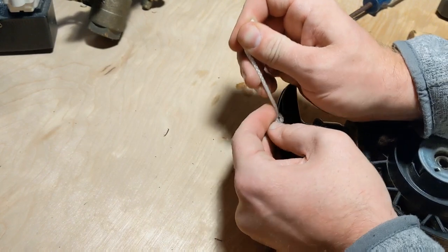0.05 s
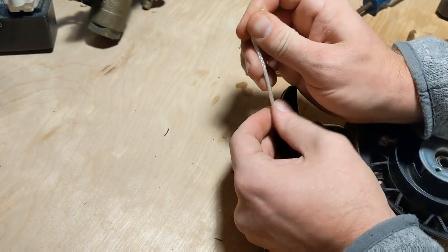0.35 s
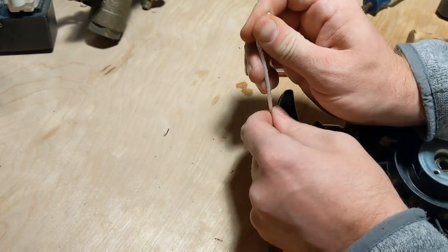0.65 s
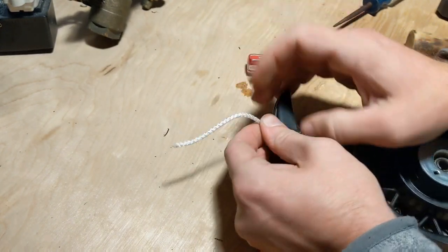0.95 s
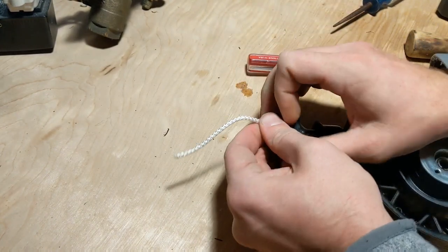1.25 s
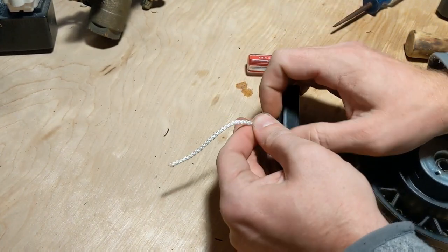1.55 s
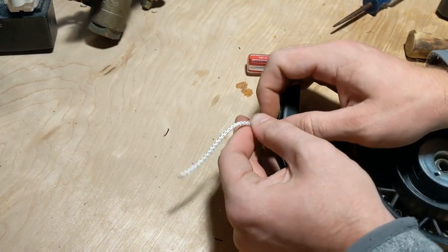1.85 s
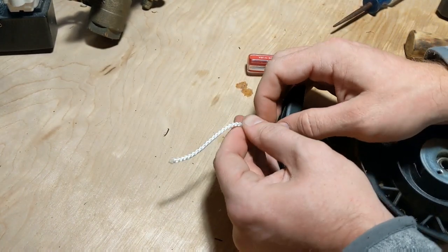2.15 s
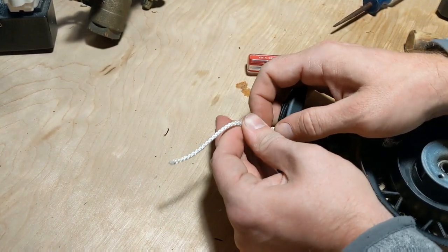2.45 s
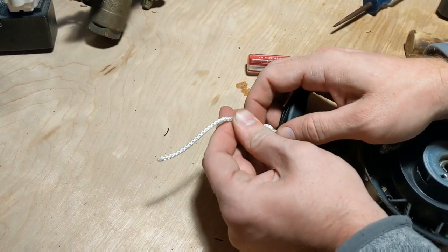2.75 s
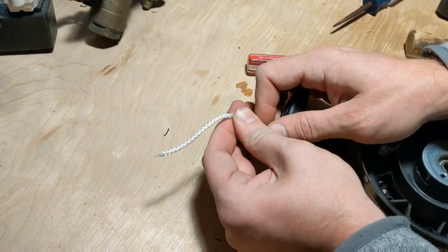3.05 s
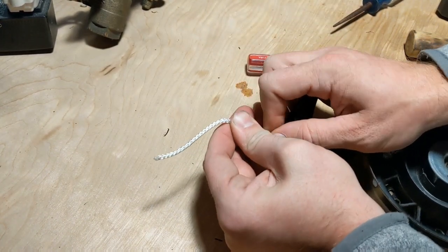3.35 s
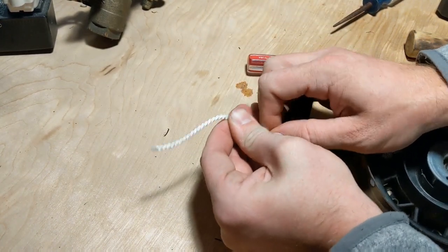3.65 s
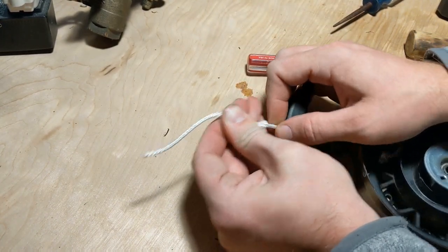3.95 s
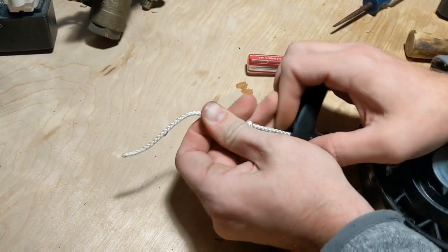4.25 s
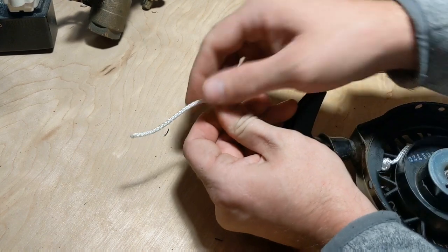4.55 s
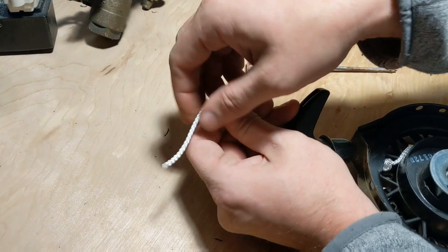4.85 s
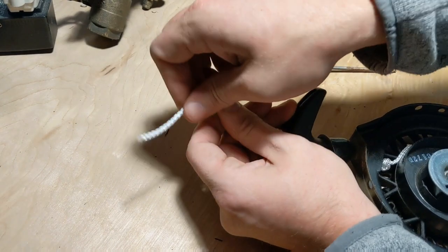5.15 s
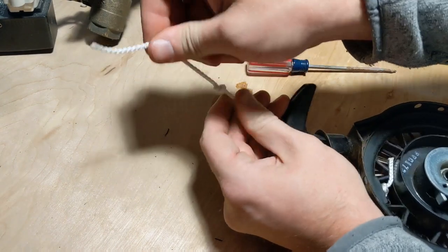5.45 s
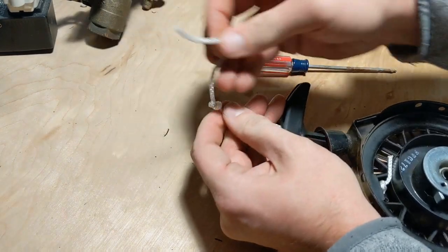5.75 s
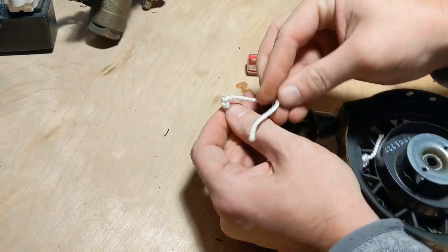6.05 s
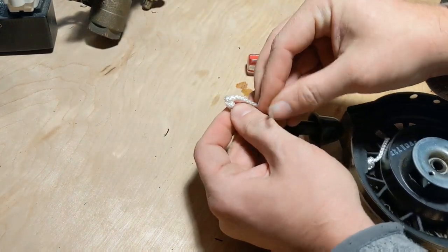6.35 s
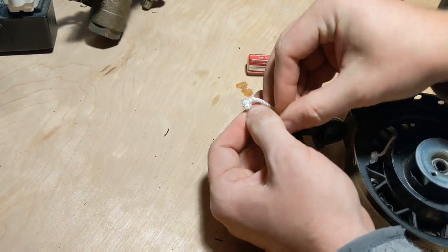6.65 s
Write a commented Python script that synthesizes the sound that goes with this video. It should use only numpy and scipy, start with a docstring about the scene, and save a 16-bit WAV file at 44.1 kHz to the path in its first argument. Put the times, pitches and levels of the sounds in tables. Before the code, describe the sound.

Quiet rubbing and swishing of cord being tied by hand, with scattered light plastic taps and one sharper clack on wood.

```python
"""A small, faintly humming workshop: two hands knot a braided cord above a plywood bench.
Fingers and sleeves rub by stick-slip; the braid hisses and swishes through the fingers.
The cord leads into a plastic pulley housing and rasps over its rim. The housing rocks, knocks and
finally drops on the bench: the shell rings in its modes, the wood thuds and sways."""
import sys
import numpy as np
from scipy import signal
from scipy.fft import rfft, irfft, next_fast_len
from scipy.io import wavfile
from scipy.ndimage import uniform_filter1d, map_coordinates

SR = 44100
rng = np.random.default_rng(int(sys.argv[2]) if len(sys.argv) > 2 else 0)


def to_wav(s):
    """Save 16-bit WAV."""
    ch = np.atleast_2d(s).T  # columns
    pcm = np.round(np.clip(ch, -1, 1) * 32767)  # PCM
    wavfile.write(sys.argv[1], SR, pcm.astype(np.int16))


N = 295911

# left-right likeness: freq_hz, correlation
STEREO_CORRELATION = [(70, 0.99), (160, 0.92), (350, 0.26), (700, 0.0095), (1500, 0.29), (5000, 0.049)]
# stereo balance: freq_hz, left_over_right_db
STEREO_BALANCE = [(200, 0.26), (380, -2), (650, 4), (1300, 2), (2400, 0.5), (4500, 2.5), (15000, 3)]
# room decay: freq_hz, t60_s
ROOM_DECAY = [(80, 0.38), (300, 0.14), (8000, 0.06)]
# room air: freq_hz, density_db
AIR_SPECTRUM = [(20, -30.5), (50, -2.5), (105, -6.5), (200, -16), (350, -20.5), (540, -15.5), (1200, -28.5),
                (2000, -32), (3400, -26.5), (4700, -29), (5800, -27), (7000, -30.5), (15500, -33)]

# skin and cloth rubbing: freq_hz, density_db
RUB_SPECTRUM = [(60, -27.5), (105, -5), (160, 3.5), (225, 2.5), (310, -4.5), (460, -1.5), (690, -9),
                (830, -17.5), (1050, -16), (1600, -39), (3200, -31), (4800, -35.5)]
# fibre hiss: freq_hz, density_db
FIBRE_SPECTRUM = [(800, -4.5), (1400, -6), (2100, -7.5), (3500, -5.5), (4700, -11.5), (5800, -6.5),
                  (7000, -14), (15500, -16)]
# dry fibres crackling: freq_hz, density_db
CRACKLE_SPECTRUM = [(2000, -6.5), (6000, -3), (15000, -8.5)]
# sliding braid: freq_hz, density_db
BRAID_SPECTRUM = [(2000, -14), (3200, -5), (4800, -8.5), (5800, 6.5), (6900, -6.5), (15000, -10)]
# hand strokes along cord and housing: centre_s, length_s, level_db
HAND_STROKES = [(0.121, 0.24, -60.5), (0.378, 0.044, -53.5), (0.62, 0.039, -58), (0.952, 0.058, -57),
                (1.18, 0.12, -57.5), (2.364, 0.11, -61.5), (2.718, 0.088, -63.5), (3.385, 0.098, -62.5),
                (3.886, 0.11, -55.5), (4.13, 0.063, -56), (4.245, 0.11, -55.5), (4.425, 0.1, -46.5),
                (5.56, 0.2, -55), (6.11, 0.095, -52.5), (6.19, 0.14, -43), (6.415, 0.069, -49.5),
                (6.578, 0.13, -53)]
# cord drawn between the fingers: centre_s, length_s, level_db
CORD_DRAWS = [(0.12, 0.27, -72.5), (1.15, 0.4, -69.5), (1.5, 0.17, -73), (2.725, 0.098, -62.5),
              (4.16, 0.12, -63.5), (4.425, 0.07, -66), (4.54, 0.1, -56)]
# fingertip skips: centre_s, level_db
FINGER_SKIPS = [(0.144, -66.5), (0.538, -66.5), (0.728, -67), (0.948, -65.5), (1.134, -65), (1.352, -67.5)]
# nail or strand catches: start_s, level_db
NAIL_CATCHES = [(0.785, -55), (2.337, -63.5), (3.678, -61.5), (4.222, -56), (5.483, -59)]
# braid slips through a pinch: centre_s, length_s, level_db
BRAID_SLIPS = [(1.52, 0.15, -63.5), (2.725, 0.08, -72), (2.81, 0.036, -72), (2.895, 0.025, -69.5),
               (3.06, 0.048, -64.5), (6.025, 0.019, -65)]
# taut braid passes over the rim: centre_s, length_s, level_db
RIM_RASPS = [(3.885, 0.07, -72.5), (4.53, 0.12, -67.5), (6.17, 0.16, -61.5)]
# rim resonances: freq_hz, width_hz, level_db
RIM_MODES = [(2320, 96, -3.5), (3170, 110, 3), (4110, 140, -3), (5600, 340, -10.5)]

# plywood response: freq_hz, density_db
BENCH_SPECTRUM = [(50, 4), (110, 1.5), (155, 3), (180, -3), (218, -1.5), (275, -17.5), (325, 1), (420, -9),
                  (900, -57)]
# hands press on the bench: start_s, level_db, pitch_hz
HAND_BUMPS = [(0.727, -58, 171), (1.135, -49, 190), (1.19, -50.5, 159), (1.227, -52.5, 156),
              (1.514, -48.5, 197), (2.037, -55.5, 187), (4.894, -53, 130), (4.94, -55.5, 120),
              (5.731, -58.5, 183), (5.76, -57.5, 163), (5.797, -58.5, 175)]
# plastic shell modes: freq_hz, level_db, t60_s, left_over_right_db
HOUSING_MODES = [(469, -1, 0.14, -0.5), (523, -5, 0.05, 5), (594.7, 0, 0.1, 9.5), (743, 4.5, 0.05, 13),
                 (1016, -4.5, 0.07, 10), (1148, -4.5, 0.05, 9), (1217, -0.5, 0.031, -4),
                 (1476, -8, 0.047, 14), (1620, -1, 0.059, 3), (1715, -8, 0.058, 13), (1900, -4, 0.042, 9),
                 (2110, 2.5, 0.04, 3.5), (2465, 3, 0.042, 7)]
# phase offset from the shell's uneven radiation: freq_hz, right_lead_rad
HOUSING_PHASE = [(350, 2.7), (620, 2), (1050, 0.22), (2400, 1.95)]
# housing meets bench: start_s, ring_db, hardness_hz, thud_db, thud_hz
HOUSING_KNOCKS = [(0.141, -55, 477, -49.5, 157.5), (0.538, -56, 510, -48.5, 179),
                  (0.786, -44.5, 583, -37, 178), (0.83, -55, 580, -55, 160),
                  (1.352, -62.5, 466, -51.5, 178), (1.489, -61.5, 720, -53.5, 156),
                  (2.147, -52, 437, -41.5, 195), (2.225, -58, 650, -52, 200),
                  (2.391, -44.5, 1340, -58, 202), (2.411, -64, 895, -53, 204),
                  (2.491, -60.5, 420, -50.5, 180), (2.57, -44.5, 480, -42, 218),
                  (2.629, -64.5, 1090, -65, 198), (2.773, -51, 666, -47, 184),
                  (2.806, -39.5, 585, -44, 194), (2.829, -53, 510, -50, 167), (2.996, -35, 600, -44.5, 220),
                  (3.019, -46, 510, -44, 139), (3.379, -60, 770, -60, 177), (3.962, -50, 700, -44, 196),
                  (4.112, -58, 676, -57, 190), (4.152, -45, 630, -45, 181), (4.313, -38, 870, -44, 180),
                  (4.338, -38.5, 570, -41, 186), (4.36, -51, 494, -45.5, 174),
                  (4.397, -55, 730, -55.5, 170.3), (4.415, -42.5, 835, -47, 198),
                  (4.484, -25, 1376, -38.5, 176), (4.536, -46.5, 690, -45.5, 149.6),
                  (5.699, -55.5, 463, -47, 167)]

GRIP_T60_S, GRIP_HARDNESS_HZ = 0.17, 672  # hand damping at this hardness; harder hits ring longer


def amp(db):
    """Decibels to gain."""
    return 10 ** (np.asarray(db) / 20)


def unit_rms(x):
    """x at rms 1."""
    return x / np.sqrt(np.mean(x ** 2) + 1e-20)


def unit_attack(x):
    """x at rms 1 over its first 16 ms."""
    return x / np.sqrt(np.mean(x[..., :SR // 62] ** 2) + 1e-20)


def curve_at(points, hz):
    """(freq_hz, value) points interpolated on a log axis."""
    knots_hz, values = np.transpose(points)
    return np.interp(np.log(hz + 1), np.log(knots_hz + 1), values)


def noise(size):
    """Two independent white channels."""
    return rng.standard_normal((2, size))


def wobble(rate_hz):
    """Smooth random curve."""
    return map_coordinates(rng.standard_normal(int(N * rate_hz / SR) + 4), [np.arange(N) * rate_hz / SR])


def swells(rows):
    """Gaussian envelopes from (centre_s, length_s, level_db), summed in power."""
    t = np.arange(N) / SR
    power = sum(amp(db) ** 2 * np.exp(-(np.pi * (t - centre_s) / length_s) ** 2)
                for centre_s, length_s, db in rows)
    return np.sqrt(power + 1e-20)


def filtered(x, response):
    """x through response(hz)."""
    size = x.shape[-1]
    padded = next_fast_len(size + SR // 4)
    return irfft(rfft(x, padded) * response(np.fft.rfftfreq(padded, 1 / SR)), padded)[..., :size]


def add(track, start_s, sound):
    """Mix a sound into a track."""
    part = track[:, max(round(start_s * SR), 0):][:, :sound.shape[-1]]
    part += sound[..., :part.shape[-1]]


def spread(pair):
    """Independent channels to stereo: alike in the bass, apart in the treble."""
    def mid_side_gains(hz):
        angle_rad = np.arccos(np.clip(curve_at(STEREO_CORRELATION, hz), -1, 1)) / 2
        return np.array([np.cos(angle_rad), np.sin(angle_rad)])
    mid, side = filtered(pair, mid_side_gains)
    balance = lambda hz: amp(np.outer([.5, -.5], curve_at(STEREO_BALANCE, hz)))
    return filtered(np.array([mid + side, mid - side]), balance)


def coloured(pair, spectrum):
    """Stereo texture shaped by a spectrum, rms 1."""
    return unit_rms(spread(filtered(pair, lambda hz: amp(curve_at(spectrum, hz)))))


def room_tone(air_db=-66, hum_hz=40, hum_db=-65):
    """Still air and a deep, wavering hum."""
    drift_rad, waver_db = .3 * wobble(3), 1.5 * wobble(5)
    hum = np.sqrt(2) * np.sin(2 * np.pi * hum_hz * np.arange(N) / SR + drift_rad)
    return amp(air_db) * coloured(noise(N), AIR_SPECTRUM) + amp(hum_db + waver_db) * hum


def room_echo(x, wet_db, rise_s=0.0036):
    """x plus its short echo from clutter and walls."""
    hz, t, bins = signal.stft(noise(SR // 2), SR, nperseg=256)
    envelope = amp(-60 * t / curve_at(ROOM_DECAY, hz)[:, None]) * (1 - np.exp(-t / rise_s)) ** 2
    tail = spread(signal.istft(bins * envelope, SR, nperseg=256)[1])
    echo = signal.fftconvolve(x, tail / np.linalg.norm(tail[0]), axes=1)[:, :x.shape[-1]]
    return x + amp(wet_db) * echo


def friction(rate_hz, scatter_db, slide_gain):
    """Uneven stick-slip releases over smooth sliding noise."""
    releases = (rng.random(N) < rate_hz / SR) * amp(scatter_db * rng.standard_normal(N))
    return unit_rms(releases * noise(N)) + slide_gain * noise(N)


def patchy_hiss(pair, depth_db=3):
    """Random time-frequency patches make the hiss shimmer unevenly."""
    bins = signal.stft(pair, nperseg=512)[2]
    patches = uniform_filter1d(rng.standard_normal(bins.shape[1:]), size=3, axis=0)
    patches = uniform_filter1d(patches, size=16, axis=1)
    return signal.istft(bins * amp(depth_db * unit_rms(patches)), nperseg=512)[1][:, :N]


def hand_rub(idle_rub_db=-71, idle_hiss_db=-84, steady_db=-44,
             hiss_db=-70.5, stroke_ref_db=-53.5, hiss_db_per_db=0.65):
    """Skin and cloth rub dully; the cord's fibres hiss under strokes and draws."""
    stroke = swells(HAND_STROKES)
    # finger pressure flutters in slow strokes, evens out above steady_db
    pressure_db = 1.8 * wobble(40) / (1 + (stroke / amp(steady_db)) ** 2)
    fidget = amp(5.5 * np.tanh(wobble(13)))
    rub_level = np.hypot(stroke, amp(idle_rub_db) * fidget)
    stroke_hiss = amp(hiss_db) * (stroke / amp(stroke_ref_db)) ** hiss_db_per_db
    drag = np.hypot(stroke_hiss, swells(CORD_DRAWS))
    hiss_level = np.hypot(drag, amp(idle_hiss_db) * fidget)
    skin = friction(rate_hz=2000, scatter_db=2, slide_gain=1)
    fibres = friction(rate_hz=900, scatter_db=3.5, slide_gain=1.1)
    rub = rub_level * coloured(skin, RUB_SPECTRUM)
    hiss = hiss_level * coloured(patchy_hiss(fibres), FIBRE_SPECTRUM)
    return amp(pressure_db) * (rub + hiss)


def fibre_crackles(length_s=0.024):
    """A skipping fingertip rustles small clumps of dry fibres."""
    snaps = friction(rate_hz=3000, scatter_db=2, slide_gain=1.2)
    envelope = swells([(centre_s, length_s, db) for centre_s, db in FINGER_SKIPS])
    return envelope * coloured(snaps, CRACKLE_SPECTRUM)


def scratch(size, cutoff_hz=7500):
    """Dry scraping noise with a dulled top."""
    return filtered(coloured(noise(size), FIBRE_SPECTRUM), lambda hz: 1 / (1 + (hz / cutoff_hz) ** 4))


def nail_catches(t60_s=0.09):
    """A nail or strand catches and lets go with a sudden scratch."""
    track, t = np.zeros((2, N)), np.arange(SR // 4) / SR
    for start_s, db in NAIL_CATCHES:
        add(track, start_s, amp(db - 60 * t / t60_s) * scratch(len(t)))
    return track


def braid_slips():
    """The braid slides under a fingertip in short, bright swishes."""
    slide = friction(rate_hz=2000, scatter_db=2, slide_gain=1.2)
    return swells(BRAID_SLIPS) * coloured(slide, BRAID_SPECTRUM)


def rim_rasps(drift_samples=50):
    """The braid's ribs excite rim resonances, which drift with cord tension."""
    def response(hz):
        return sum((-1) ** k * amp(db) * 1j * hz * width_hz / (mode_hz ** 2 - hz ** 2 + 1j * hz * width_hz)
                   for k, (mode_hz, width_hz, db) in enumerate(RIM_MODES))
    ringing = filtered(noise(N), response)
    position = np.arange(N) + drift_samples * wobble(7)
    drifting = np.array([map_coordinates(channel, [position]) for channel in ringing])
    return swells(RIM_RASPS) * unit_rms(spread(drifting))


def bench_sway(t, mode_hz=63, t60_s=0.6, rise_s=0.0018):
    """The whole bench swings in its lowest mode."""
    return np.sin(2 * np.pi * mode_hz * t) * amp(-60 * t / t60_s) * (1 - np.exp(-t / rise_s))


def bench_thud(t, pitch_hz, glide, glide_s=0.0026, push_t60_s=0.041, rise_s=0.0097,
               shudder_gain=0.65, shudder_t60_s=0.14, cutoff_hz=600):
    """A low push, falling in pitch as fast bending waves arrive first, then a diffuse shudder."""
    cycles = pitch_hz * (t + glide * glide_s * (1 - np.exp(-t / glide_s)))
    push = unit_attack(np.sin(2 * np.pi * cycles) * amp(-60 * t / push_t60_s) * (1 - np.exp(-t / rise_s)))
    shudder = unit_attack(coloured(noise(len(t)), BENCH_SPECTRUM) * amp(-60 * t / shudder_t60_s))
    board_inertia = signal.butter(2, cutoff_hz, fs=SR, output="sos")
    return signal.sosfilt(board_inertia, push + shudder_gain * shudder)


def hand_bumps():
    """Soft thuds of the hands through the plywood."""
    track, t = np.zeros((2, N)), np.arange(SR // 2) / SR
    for start_s, db, pitch_hz in HAND_BUMPS:
        add(track, start_s, amp(db) * bench_thud(t, pitch_hz, glide=0.89))
    return track


def housing_ring(t, hardness_hz, rib_t60_s=0.15, jolt_gain=0.039, jolt_t60_s=0.017):
    """One blow on the shell: soft contacts reach the low modes, hard ones mostly the higher."""
    hz, db, t60_s, pan_db = np.transpose(HOUSING_MODES)[:, :, None]
    # each grip shifts the modes; a hard, free drop rings nearly true
    grip = min(1, (GRIP_HARDNESS_HZ / hardness_hz) ** 2)
    hz = hz * (1 + grip * 0.015 * rng.standard_normal(hz.shape))
    decays = amp(db + 2 * grip * rng.standard_normal(hz.shape) - 60 * t / t60_s)
    offset_rad = curve_at(HOUSING_PHASE, hz) / 2
    modes = [decays * amp(side * pan_db / 2) * np.sin(2 * np.pi * hz * t - side * offset_rad)
             for side in (1, -1)]
    ribs = spread(noise(len(t))) * amp(-60 * t / rib_t60_s)  # many weak, short-lived modes
    ring = np.sum(modes, axis=1) + ribs
    jolt = np.sin(2 * np.pi * 0.883 * hardness_hz * t) * amp(-60 * t / jolt_t60_s)  # shell stops dead
    lowpass = signal.butter(4, hardness_hz, fs=SR, output="sos")
    highpass = signal.butter(2, 0.56 * hardness_hz, "highpass", fs=SR, output="sos")
    contact_band = lambda x: unit_attack(signal.sosfilt(np.vstack([lowpass, highpass]), x))
    return unit_attack(contact_band(ring) + jolt_gain * contact_band(jolt))


def knot_tugs(start_s=0.046, period_s=0.033, count=3, level_db=-58, hardness_hz=600):
    """The knot tightens strand by strand; each step tugs the housing through the cord."""
    track, t = np.zeros((2, N)), np.arange(SR // 4) / SR
    for step in range(count):
        add(track, start_s + step * period_s, amp(level_db) * housing_ring(t, hardness_hz))
    return track


def knock(t, ring_db, hardness_hz, thud_db, thud_hz,
          glide_above_hz=585, crack_t60_s=0.092, scuff_db=-33, scuff_t60_s=0.26, sway_db=-13):
    """The rim hits the bench: plastic rings and cracks, wood thuds and sways."""
    hand_damping = amp(-60 * t / GRIP_T60_S * (GRIP_HARDNESS_HZ / hardness_hz) ** 2)
    ring = unit_attack(housing_ring(t, hardness_hz) * hand_damping)
    # harder contacts launch faster bending waves: the thud starts higher
    thud = bench_thud(t, thud_hz, glide=1 / (1 + (glide_above_hz / hardness_hz) ** 4))
    crack_db = -15.5 + 12.5 * np.log2(hardness_hz / 1260)
    crack = scratch(len(t)) * amp(crack_db - 60 * t / crack_t60_s)
    scuff = coloured(noise(len(t)), FIBRE_SPECTRUM) * amp(scuff_db - 60 * t / scuff_t60_s)
    blow = amp(ring_db) * (ring + scuff + crack) + amp(thud_db) * thud
    sway_force = np.hypot(amp(thud_db), 0.45 * amp(ring_db)) * (185 / thud_hz) ** 3
    return room_echo(blow, wet_db=-14.0) + sway_force * amp(sway_db) * bench_sway(t)


def housing_knocks():
    """The housing rocks on the bench, often falling back for a second contact."""
    track, t = np.zeros((2, N)), np.arange(SR // 2) / SR
    for start_s, ring_db, hardness_hz, thud_db, thud_hz in HOUSING_KNOCKS:
        add(track, start_s, knock(t, ring_db, hardness_hz, thud_db, thud_hz))
    return track


def scene():
    """Bench, hands, cord and room, summed in stereo."""
    handling = housing_knocks() + hand_bumps() + hand_rub()
    cord = knot_tugs() + braid_slips() + rim_rasps() + nail_catches() + fibre_crackles()
    return handling + cord + room_tone()


def record(dry, echo_s=0.000522, echo_db=-15, cutoff_hz=15600):
    """A reflection beside the microphones ripples the treble; a hard band limit follows."""
    ripple = lambda hz: 1 + amp(echo_db) * hz / (hz + 2000) * np.exp(-2j * np.pi * hz * echo_s)
    return filtered(dry, lambda hz: ripple(hz) * (hz < cutoff_hz))


dry = scene()
out = record(dry)
to_wav(out)
```